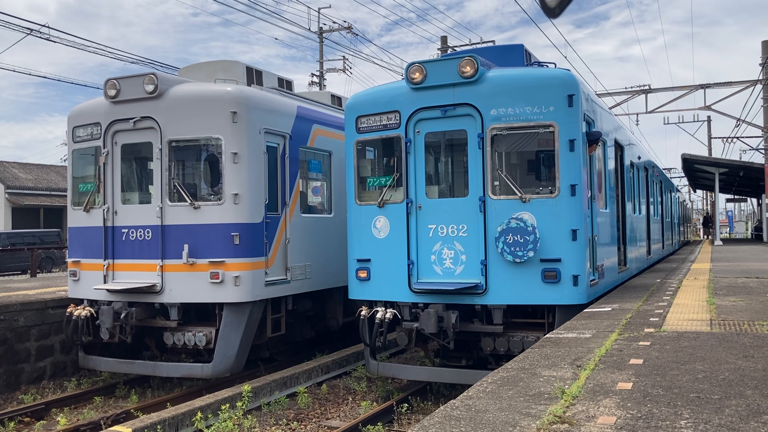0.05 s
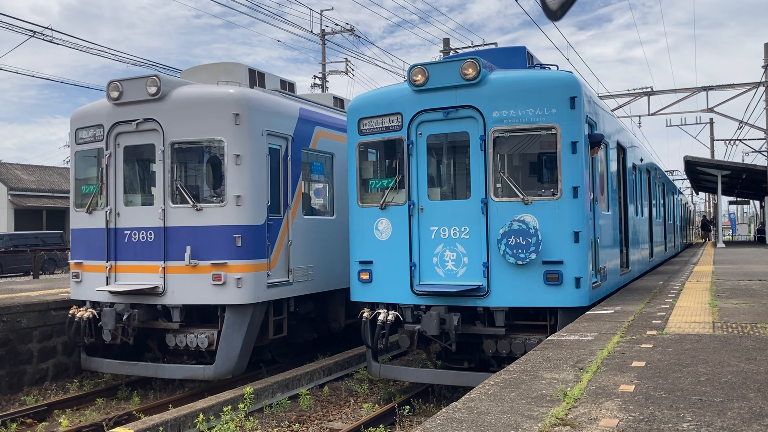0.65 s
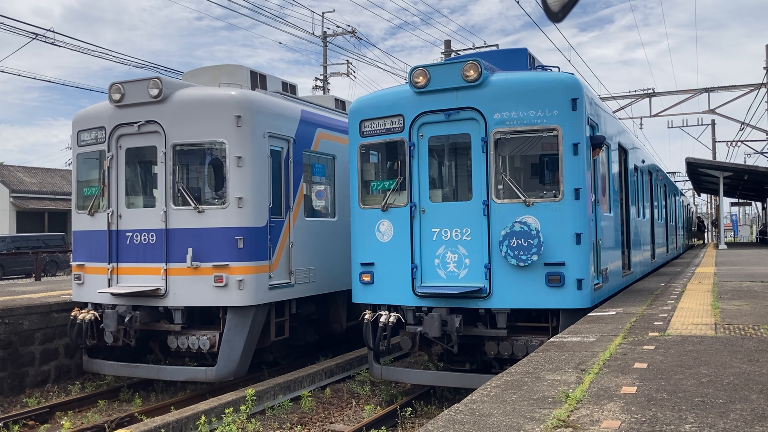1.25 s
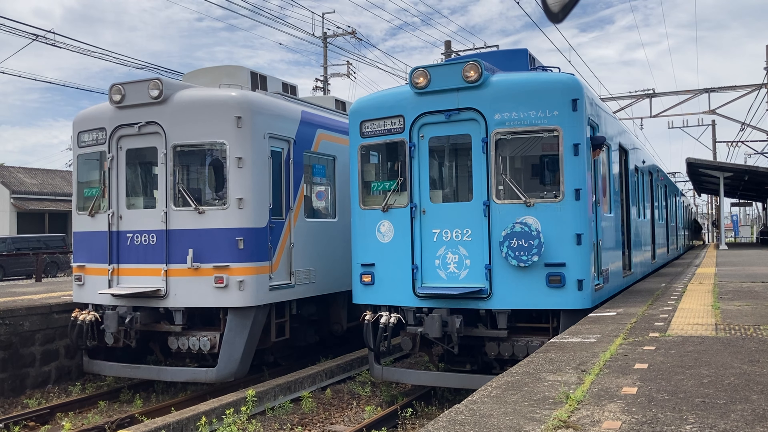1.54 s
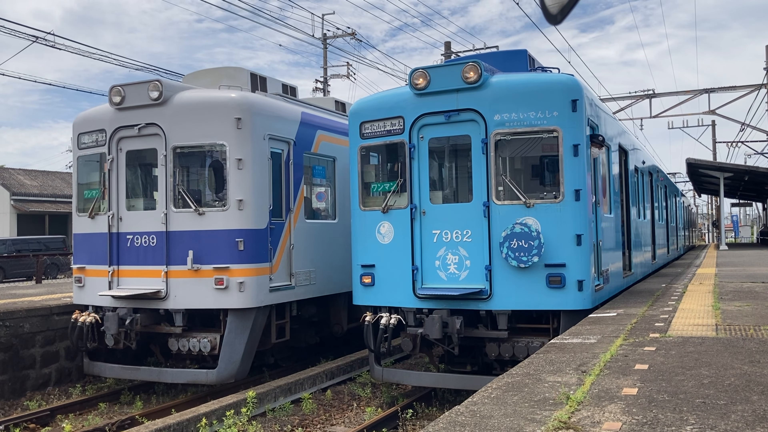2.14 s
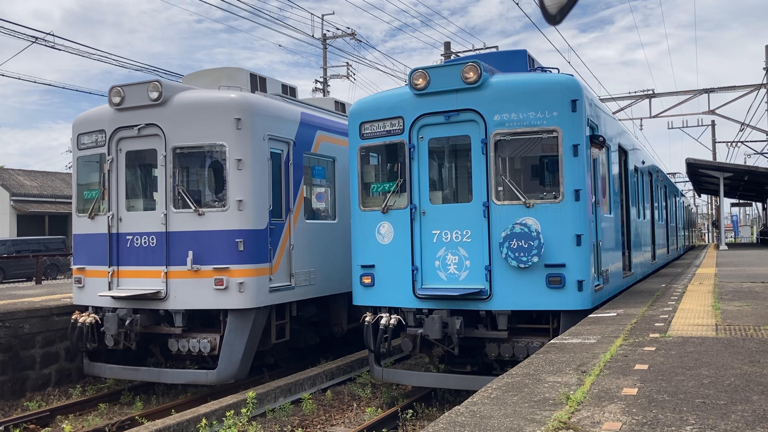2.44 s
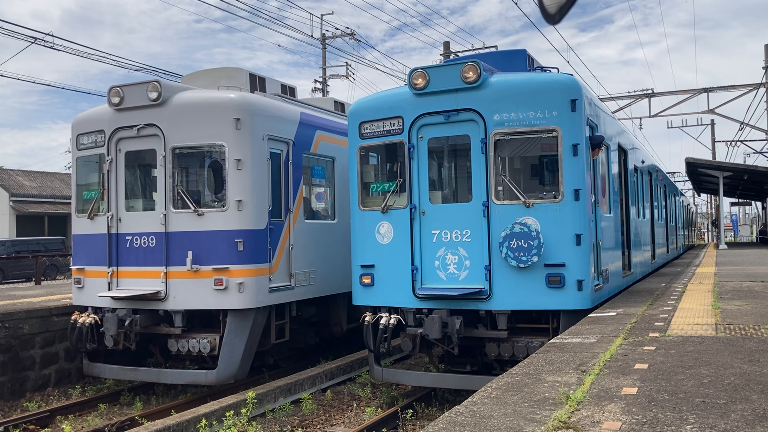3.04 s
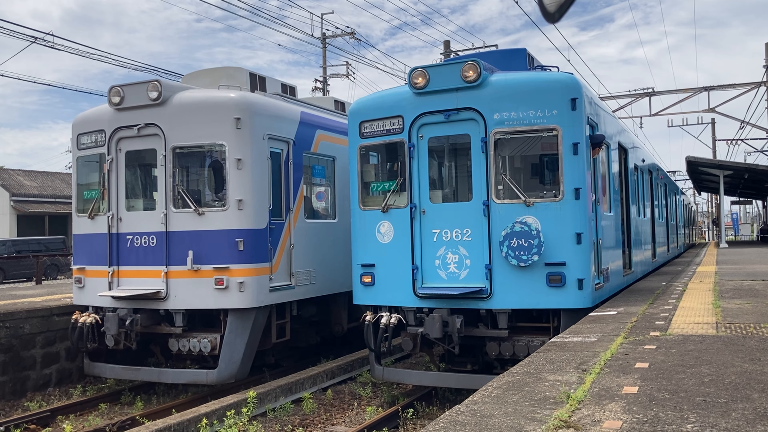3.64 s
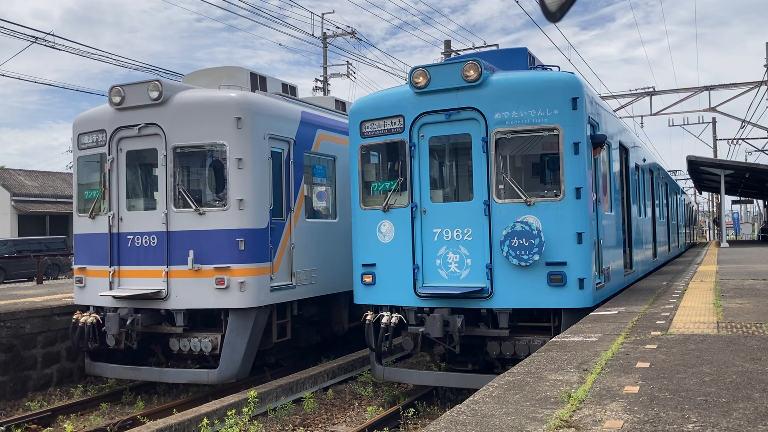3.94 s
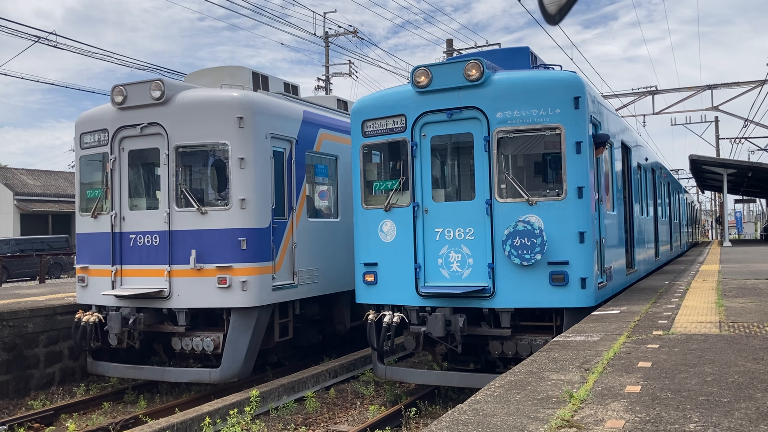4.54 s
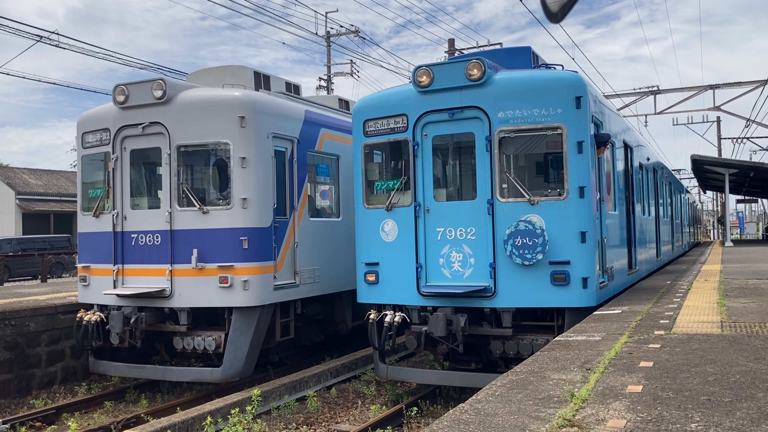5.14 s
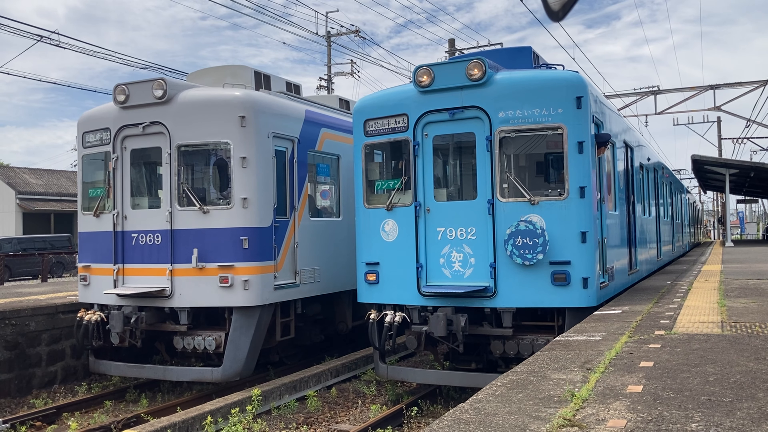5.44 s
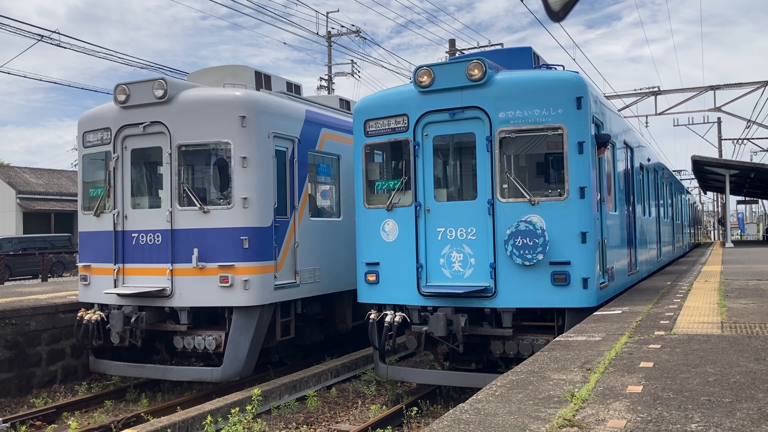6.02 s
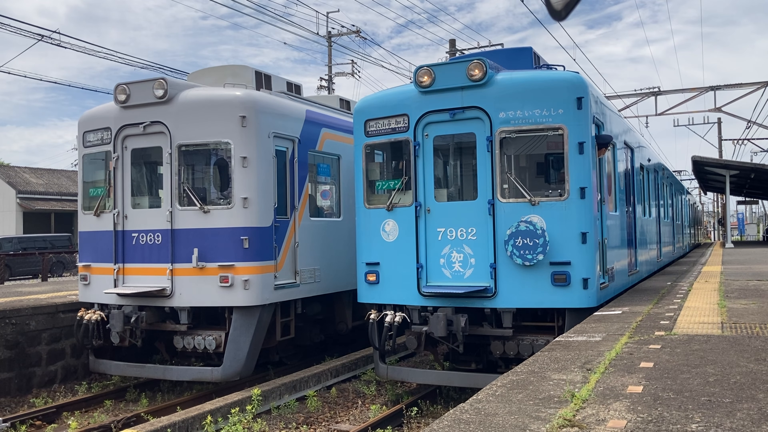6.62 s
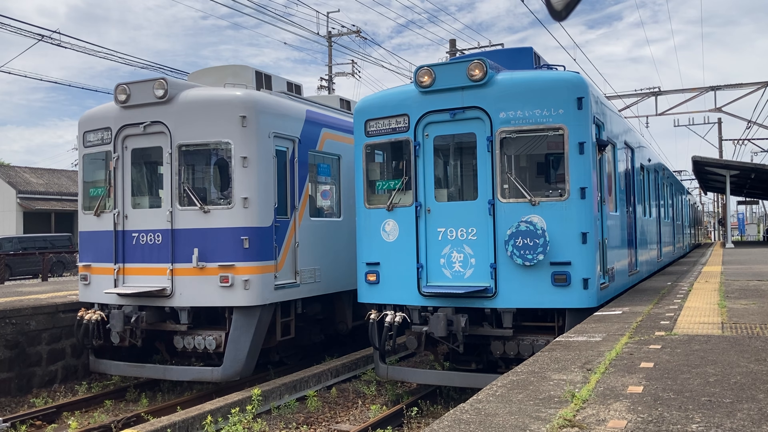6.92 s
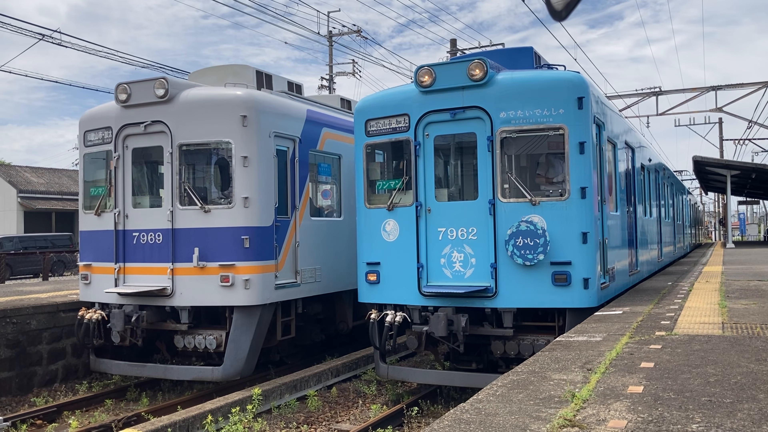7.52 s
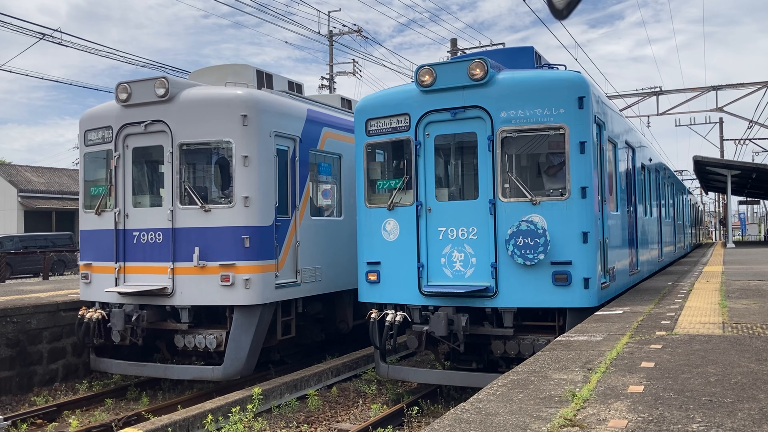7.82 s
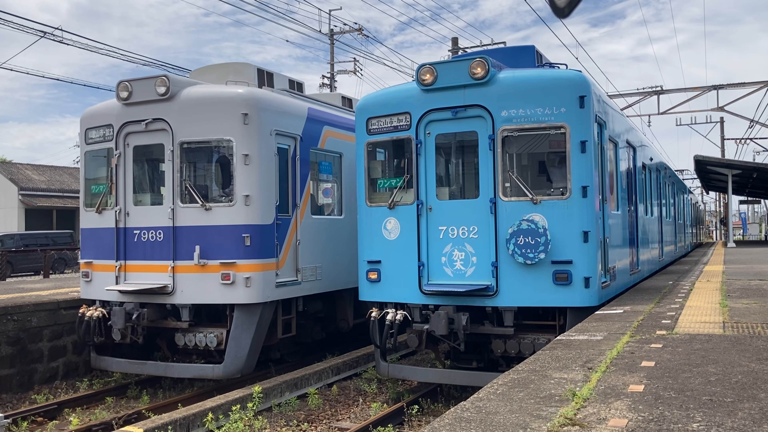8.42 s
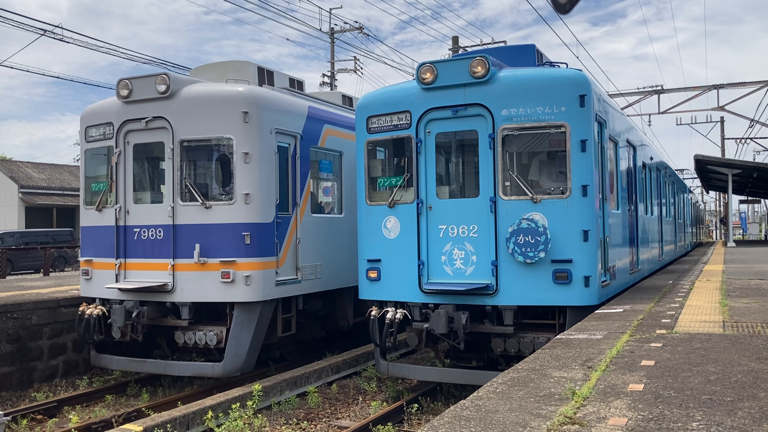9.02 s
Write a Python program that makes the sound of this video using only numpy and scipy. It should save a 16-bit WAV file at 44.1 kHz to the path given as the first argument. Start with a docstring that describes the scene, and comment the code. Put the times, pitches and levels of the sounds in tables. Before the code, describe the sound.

Waiting electric trains hum and whine over rumbling fans, while compressed air puffs out and a valve later snaps open and vents.

```python
"""Two electric trains waiting

At an open-air platform, motor-generators hum and whine, and fan blades sing over a rumble of air.
Compressed air hisses out in faint puffs and one strong one; later a valve snaps open and vents.
There are a few ticks and a far clack. A light breeze and soft bumps touch the microphone."""
import sys
import numpy as np
from scipy import signal
from scipy.fft import rfft, irfft
from scipy.io import wavfile

SR = 44100
rng = np.random.default_rng(int(sys.argv[2]) if len(sys.argv) > 2 else 0)


def to_wav(sig):
    """Store sig (one row per channel, or 1-D mono) as 16-bit WAV at the path in sys.argv[1].

    Samples outside -1..1 are clipped; the rate is SR.
    """
    pcm = np.clip(np.atleast_2d(sig), -1, 1) * 32767
    pcm = np.round(pcm).astype(np.int16)
    wavfile.write(sys.argv[1], SR, pcm.T)  # frames by channels


N = 408366
TIME = np.arange(N) / SR
FREQS = np.maximum(np.fft.rfftfreq(N, 1 / SR), 1)

# In the tables, lead_rad is how far the left wave runs ahead of the right, density_db is noise
# strength per hertz before any gain, and fade_s is the time to die away by 60 dB.
# the generator's hum: supply_multiple, level_db, lead_rad
GENERATOR_HUM = [(1, -47, -.1), (2, -49, -.2), (9, -47.7, -.2), (21, -75, .1), (54, -71, 3.1)]
# the other train's generator, a little faster, so the two hums throb: pitch_hz, level_db, lead_rad
OTHER_GENERATOR = (544.4, -56.3, .2)
# whine from the generator's slots, lowest tone first: level_db
SLOT_WHINE = [-75, -74, -77, -74, -78, -74, -78, -81, -74]
# the shaft's faint buzz: pitch_hz, typical_level_db
SHAFT_BUZZ = [(800, -99), (1600, -89), (2900, -86), (3700, -87), (5200, -98), (7400, -91), (10000, -105)]
# humming fan motors and panels: pitch_hz, level_db, lead_rad
MOTOR_HUM = [(87.5, -43, -.1), (92.9, -47.5, -.1), (127.9, -50, -.2), (164.2, -49, -.2), (172.9, -47, -.2),
             (187.1, -49, 0), (220.7, -48, 0), (262.4, -52, 0), (349.9, -55, -.1), (453.5, -54.7, .2),
             (1013.4, -70, 0), (3954, -77, 2.9), (6989, -77, 0), (7152, -79, 0), (7964, -79, -1.6),
             (8051, -80, -1.8)]
# blowers: pitch_hz, flutter_share, a list of (level_db, lead_rad) for 1, 2, ... times that pitch
BLOWER_TONES = [(695.8, .18, [(-55.2, 1.3), (-66.8, .5), (-78, 1.5), (-71, 1.5)]), (740.3, .5, [(-58, 2.1),
                (-67.8, -2.1), (-74.5, 1.5)]), (1361.3, .12, [(-62.9, 0)])]
# swells and fades, one list for each blower: time_s, gain_db
BLOWER_SWELLS = [
    [(0, 7), (.62, 6), (.8, 1), (4.7, 2), (9.26, -2)],
    [(.65, 4), (1.3, 1), (3.5, -3), (4, 3.5), (5.1, 1.5), (6.5, 5), (9.26, 4.5)],
    [(0, -1), (1.05, 2.5), (1.6, -4.5), (2.2, 2.5), (2.65, -2), (3.75, -0.5), (4.1, -6), (4.6, -1),
     (4.95, 5), (5.5, -1), (6.4, 2.5), (7.2, -2.5), (8.3, 1), (9.26, -7)],
]
# a cooling fan that wavers and slows a little: time_s, pitch_hz, level_db
COOLING_FAN = [(0, 1010, -58), (2.1, 1005.8, -65), (4.3, 1007.7, -57.5), (6, 1005, -68), (7.1, 1004, -61),
               (8.2, 1003, -63), (9.26, 1002, -74)]

# a fine, bright leak: frequency_hz, density_db
LEAK_HISS = [(700, -102), (1200, -85.5), (2600, -85), (3600, -82), (4400, -84), (5300, -93.5),
             (7500, -87.5), (9500, -89), (12000, -90.5), (15500, -99)]
# puffs from the leak: start_s, gain_db, hold_s
PUFFS = [(2.077, -14, .04), (2.447, -10.5, 0.15), (3.515, 1, 0.12), (4.5, -17.5, 1.3), (6.05, -18, 0.41),
         (8.6, -9.5, 0.63)]
# duller air from the open valve: frequency_hz, density_db
VENT_HISS = [(400, -72), (700, -74.5), (1100, -87.5), (1700, -88.5), (2500, -85.5), (3600, -87.5),
             (5200, -96), (9000, -97), (12000, -100.5), (15500, -105)]
# valve snaps and small ticks: start_s, gain_db, fade_s, tilt_db_per_octave
SNAPS = [(0.759, -12, .035, 3), (6.168, -10, 0.014, 9), (6.171, -14, .06, -1), (8.125, -19, .08, 10),
         (8.142, -13, 0.23, 3.5), (8.478, 4.5, 0.048, 1), (8.482, -2.5, 0.15, 1.5)]
# the crack of air in a snap: frequency_hz, density_db
SNAP_NOISE = [(700, -82), (1700, -70), (2500, -77), (3600, -72), (5500, -78.5), (9000, -85), (11200, -83.5),
              (15500, -96)]
# the ringing valve and pipe: pitch_hz, level_db, fade_s
VALVE_RING = [(1212, -54, .16), (1880, -52, .11), (2055, -49, 0.17), (3110, -49, .06)]
# clacks and rattles far down the train: start_s, gain_db, fade_s, tilt_db_per_octave
CLACKS = [(6.228, -8, .15, 0), (6.286, 2, .1, 3), (6.298, 2, 0.088, 3), (6.335, -13, 0.12, -4),
          (6.351, -19, .25, -6)]
# the dull noise of a clack: frequency_hz, density_db
CLACK_NOISE = [(500, -63), (1000, -74), (1600, -77), (3000, -88), (5000, -91)]

# air churned by fans under the cars: frequency_hz, density_db
FAN_RUMBLE = [(20, -84), (32, -63.5), (50, -59), (85, -57), (130, -59.5), (190, -60.5), (300, -66.5),
              (430, -70.5), (560, -72), (800, -80.5), (1000, -78.5), (1600, -91.5)]
# air rushing through grilles: frequency_hz, density_db
GRILLE_RUSH = [(1600, -92), (2000, -90), (2450, -96.5), (3000, -88), (3700, -89), (4400, -95),
               (5100, -99.6), (6300, -99.3), (7000, -94), (8000, -93), (8900, -100.5), (10000, -104.5),
               (13500, -106.9), (15300, -114)]
# standing waves in ducts and between cars: centre_hz, width_hz, gain_db
DUCT_BANDS = [(171, 33, 1.5), (302, 23, -4), (349, 88, 2), (419, 30, -2.5), (840, 39, -4), (872, 24, 4.5),
              (1067, 17, -9), (1475, 31, 6), (2002, 30, 5.5), (3250, 50, -18), (3870, 100, 3)]
# breeze on the microphone: frequency_hz, density_db
BREEZE_NOISE = [(25, -47), (38, -27), (55, -10), (80, -13), (150, -23.5), (300, -34)]
# gusts of breeze: peak_s, gain_db, length_s
GUSTS = [(1.7, -48, 0.16), (2.2, -44.5, 0.71), (6.25, -39.5, 0.15), (6.914, -43, 0.28),
         (7.216, -40.5, 0.44), (7.93, -36.5, 0.24)]
# soft bumps on the microphone's case: start_s, level_db, start_pitch_hz, fade_s
BUMPS = [(7.829, -19.5, 70, 0.13), (7.906, -23, 173, 0.073), (7.939, -20, 80, 0.12),
         (8.287, -10, 261, 0.097), (9.162, -14.5, 110, 0.12), (9.191, -17.5, 75, 0.12)]
# how alike the air sounds on the left and right: frequency_hz, likeness (0 to 1)
STEREO_LIKENESS = [(60, .8), (300, .95), (700, .85), (1400, .7), (2000, .6), (2900, .45), (4200, .3),
                   (5400, .7), (6700, .9), (15300, .9)]
# left and right move together in the bass and slip apart in the treble: frequency_hz, lead_rad
STEREO_LEAD = [(1400, 0), (2100, -.7), (2500, 0), (2900, 1.5), (3300, 2.6), (5400, 3.1), (7000, 0),
               (9200, -3.1), (11400, -6.3), (13700, -9.4), (15700, -12.6)]

SUPPLY_HZ = 59.89  # the train's alternating current


def generator():
    """Magnets hum at multiples of the supply; the spinning rotor splits the slot whine into many tones."""
    hum = sum(tone(k * SUPPLY_HZ, db, lead, flutter=.06, rate_hz=3) for k, db, lead in GENERATOR_HUM)
    other_train = tone(*OTHER_GENERATOR, flutter=.1, rate_hz=3)
    slot_hz = SUPPLY_HZ * (49 + np.arange(len(SLOT_WHINE)) / 2)
    whine = sum(tone(hz, db, .93, flutter=.56, rate_hz=5.5) for hz, db in zip(slot_hz, SLOT_WHINE))
    return hum + other_train + whine


def shaft_buzz(uneven_db=3):
    """The generator's shaft adds faint, uneven tones at multiples of its turning speed."""
    shaft_hz = SUPPLY_HZ / 2
    multiples = np.arange(SHAFT_BUZZ[0][0] // shaft_hz, SHAFT_BUZZ[-1][0] // shaft_hz)
    bins = np.round(multiples * shaft_hz * N / SR).astype(int)  # places in FREQS
    spread_db = uneven_db * rng.standard_normal((2, len(FREQS)))
    phase = 2 * np.pi * rng.random((2, len(FREQS)))
    tones = np.zeros((2, len(FREQS)), complex)
    tones[:, bins] = (from_db(curve(SHAFT_BUZZ) + spread_db) * np.exp(1j * phase))[:, bins]
    return irfft(to_stereo(*tones), N) * N / 2


def motors(beat_s=5.2, peak_s=.77, swing_db=4, deep_hz=100):
    """Fan motors and panels hum; the deepest tones swell and fade in a slow beat."""
    beat_db = swing_db * np.cos(2 * np.pi * (TIME - peak_s) / beat_s)
    return sum(tone(hz, db + beat_db if hz < deep_hz else db, lead, flutter=.31, rate_hz=1.5)
               for hz, db, lead in MOTOR_HUM)


def blowers():
    """Blade tones flutter in the air they stir, and slowly swell or fade."""
    out = 0
    for (hz, flutter, harmonics), swells in zip(BLOWER_TONES, BLOWER_SWELLS):
        blades = sum(tone(k * hz, db, lead, flutter, rate_hz=4.2)
                     for k, (db, lead) in enumerate(harmonics, 1))
        out = out + blades * from_db(np.interp(TIME, *np.transpose(swells)))
    return out


def cooling_fan():
    """One clean blade tone follows the fan's speed."""
    times, hz, db = np.transpose(COOLING_FAN)
    cycles = np.cumsum(np.interp(TIME, times, hz)) / SR
    return np.sqrt(2) * from_db(np.interp(TIME, times, db)) * np.sin(2 * np.pi * cycles)


def leak(seep_db=-47, rise_s=.048, fall_db_per_s=36, trickle_db=-10, trickle_db_per_s=14):
    """Compressed air always seeps out; sputtering puffs open quickly, hold, drop and trickle on."""
    power = from_db(seep_db) ** 2
    for start_s, db, hold_s in PUFFS:
        opening = np.clip((TIME - start_s) / rise_s, 0, 1)
        closed_s = seconds_since(start_s + hold_s)
        fall_db = np.maximum(-fall_db_per_s * closed_s, trickle_db - trickle_db_per_s * closed_s)
        power = power + (opening * from_db(db + fall_db)) ** 2
    return noise(LEAK_HISS) * np.sqrt(power) * flicker(depth_db=1, rate_hz=28)


def leak_whistle(pitch_hz=10200, width_hz=520, density_db=-95.5, start_s=3.4, end_s=6, ramp_s=.28):
    """After the strong puff, air sings thinly in a narrow gap until it closes."""
    hiss = noise([(pitch_hz / 2, density_db), (pitch_hz * 2, density_db)])
    flow = np.clip(np.minimum(TIME - start_s, end_s - TIME) / ramp_s, 0, 1)
    return irfft(rfft(hiss) * band(pitch_hz, width_hz), N) * flow


def valve_snaps():
    """Each snap is a crack of air and a short ring of metal."""
    out = bursts(SNAPS, SNAP_NOISE)
    for start_s, db, _, tilt in SNAPS:
        start = int(start_s * SR)
        age = TIME[:N - start][:SR // 2]
        for hz, ring_db, fade_s in VALVE_RING:
            level_db = db + ring_db + tilt * np.log2(hz / 4000) - 60 * age / fade_s
            ring = np.sin(2 * np.pi * (hz * age + rng.random()))
            out[:, start:start + len(age)] += from_db(level_db) * ring
    return out


def vent(start_s=8.43, gain_db=3.5, rise_s=.41, fall_db_per_s=7.5):
    """A sputtering jet grows as the valve opens, then weakens as the pressure drops."""
    age = seconds_since(start_s)
    flow = np.minimum(age / rise_s, 1) * from_db(gain_db - fall_db_per_s * age)
    return noise(VENT_HISS) * flow * flicker(depth_db=1.7, rate_hz=22)


def airflow(rumble_db=-.78, lumpy_below_hz=270):
    """Fans push air: a lumpy rumble and a smoother rush, with some bands lifted or dulled by ducts."""
    rumble = noise(FAN_RUMBLE) * from_db(rumble_db)
    bass = irfft(rfft(rumble) / (1 + (FREQS / lumpy_below_hz) ** 4), N)
    lumps = bass * (flicker(depth_db=2.5, rate_hz=8) - 1)
    rush = noise(GRILLE_RUSH) * flicker(depth_db=.99, rate_hz=18)
    ducts_db = sum(db * band(hz, width_hz) for hz, width_hz, db in DUCT_BANDS)
    return irfft(rfft(rumble + lumps + rush) * from_db(ducts_db), N)


def far_clack():
    """Something clacks and rattles far down the train."""
    return bursts(CLACKS, CLACK_NOISE)


def breeze(calm_db=-62.5):
    """Gusts rise out of calm air; swirls push a little differently on each side of the microphone."""
    swirls = noise(BREEZE_NOISE, shared=.9)
    gusts = sum(from_db(db) * np.exp(-(2 * (TIME - peak_s) / length_s) ** 2)
                for peak_s, db, length_s in GUSTS)
    return swirls * (from_db(calm_db) + gusts) * flicker(depth_db=3, rate_hz=10)


def bumps(rest_hz=58, settle_s=.0054, rise_s=.0019):
    """Each bump shakes the microphone briefly, its pitch sinking as the contact softens."""
    out = np.zeros(N)
    for start_s, db, hz, fade_s in BUMPS:
        age = seconds_since(start_s)
        cycles = rest_hz * age + (hz - rest_hz) * settle_s * (1 - np.exp(-age / settle_s))
        loudness = from_db(db - 60 * age / fade_s) * (1 - np.exp(-age / rise_s))
        out += loudness * np.sin(2 * np.pi * cycles)
    return out


def bursts(hits, spectrum, rise_s=.0012, echo_db=-22, echo_fade_s=.47):
    """Bursts of noise die quickly, leaving a faint echo between the cars."""
    out = np.zeros((2, N))
    for start_s, db, fade_s, tilt in hits:
        age = seconds_since(start_s)
        decay = from_db(-60 * age / fade_s) + from_db(echo_db - 60 * age / echo_fade_s)
        out += from_db(db) * (1 - np.exp(-age / rise_s)) * decay * noise(spectrum, tilt)
    return out


def tone(hz, level_db, lead_rad, flutter, rate_hz):
    """A stereo tone whose strength and timing waver in swirling air."""
    wavering = (1 + flutter * (drift(rate_hz) + 1j * drift(rate_hz))) / np.sqrt(1 + 2 * flutter ** 2)
    wave = wavering * np.exp(2j * np.pi * (hz * TIME + rng.random()))
    left_right = np.exp(.5j * lead_rad * np.array([[1], [-1]]))
    return np.sqrt(2) * from_db(level_db) * np.real(wave * left_right)


def noise(spectrum, tilt=0, shared=1):
    """Stereo noise shaped by a table, fading steeply past its ends; tilt (dB per octave) brightens it."""
    octaves_below = np.maximum(np.log2(spectrum[0][0] / FREQS), 0)
    octaves_above = np.maximum(np.log2(FREQS / spectrum[-1][0]), 0)
    level_db = curve(spectrum) - 60 * (octaves_below + octaves_above) + tilt * np.log2(FREQS / 4000)
    mid, side = rng.standard_normal((2, len(FREQS))) + 1j * rng.standard_normal((2, len(FREQS)))
    return irfft(to_stereo(mid, side, shared) * from_db(level_db) * np.sqrt(SR * N / 8), N)


def to_stereo(mid, side, shared=1):
    """Mix two unrelated spectra into a left and a right that are partly alike."""
    alike = np.clip(shared * curve(STEREO_LIKENESS), 0, 1)
    signs = np.array([[1], [-1]])
    pair = np.sqrt(1 + alike) * mid + np.sqrt(1 - alike) * side * signs
    return pair * np.exp(.5j * curve(STEREO_LEAD) * signs)


def drift(rate_hz):
    """A smooth random wander around zero, with a typical size of 1."""
    step, warm_up = 100, 2000  # samples per step, steps thrown away
    memory = np.exp(-2 * np.pi * rate_hz * step / SR)
    jitter = rng.standard_normal(N // step + warm_up + 2)
    slow = signal.lfilter([1], [1, -2 * memory, memory ** 2], jitter)[warm_up:]
    return np.interp(np.arange(N) / step, np.arange(len(slow)), slow / slow.std())


def flicker(depth_db, rate_hz):
    """A gain that wanders up and down at random."""
    return from_db(depth_db * drift(rate_hz))


def band(centre_hz, width_hz):
    """A peak of height 1 around one frequency."""
    return 1 / (1 + (2 * (FREQS - centre_hz) / width_hz) ** 2)


def curve(points):
    """Join a table's points to get a value at every frequency."""
    hz, value = np.transpose(points)
    return np.interp(np.log(FREQS), np.log(hz), value)


def seconds_since(start_s):
    """A clock that stays at zero until the start."""
    return np.maximum(TIME - start_s, 0)


def from_db(db):
    """Turn decibels into a multiplier."""
    return 10 ** (np.asarray(db) / 20)


def scene():
    """Everything heard from the platform."""
    machines = generator() + shaft_buzz() + blowers() + cooling_fan() + motors()
    compressed_air = leak() + vent() + leak_whistle() + valve_snaps()
    return machines + compressed_air + airflow() + breeze() + far_clack() + bumps()


def record(dry, lowest_hz=32, highest_hz=15720):
    """Soften the deepest bass and cut off the highest treble."""
    bass_cut = signal.butter(3, lowest_hz, "high", fs=SR, output="sos")
    treble_cut = signal.ellip(12, .1, 80, highest_hz, fs=SR, output="sos")
    return signal.sosfilt(treble_cut, signal.sosfilt(bass_cut, dry))


dry = scene()
out = record(dry)
to_wav(out)
```